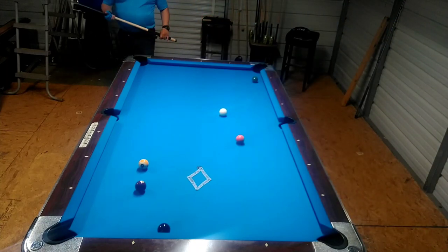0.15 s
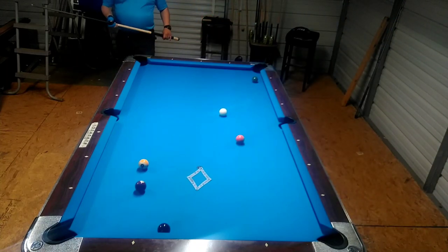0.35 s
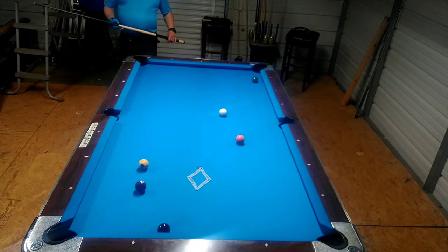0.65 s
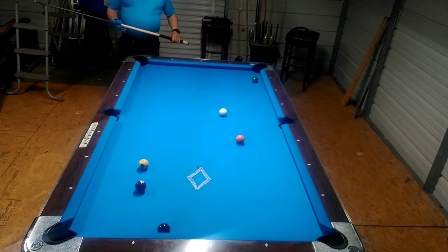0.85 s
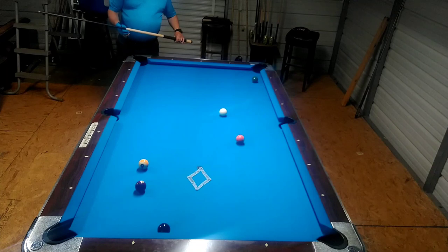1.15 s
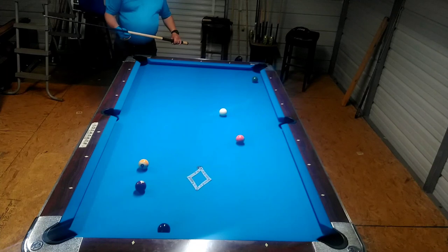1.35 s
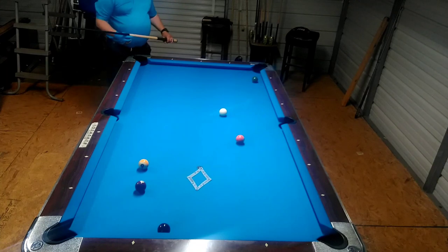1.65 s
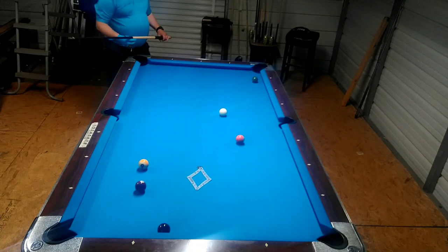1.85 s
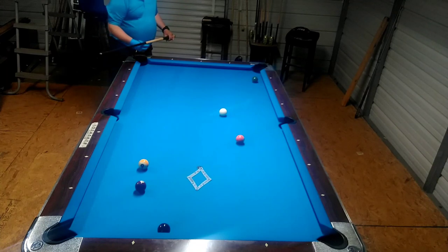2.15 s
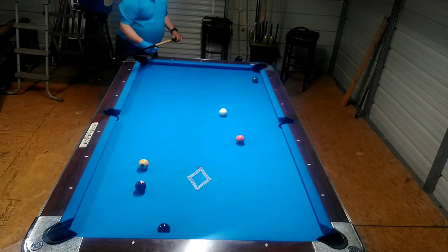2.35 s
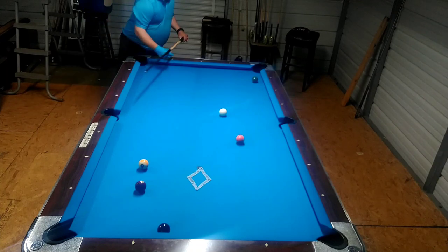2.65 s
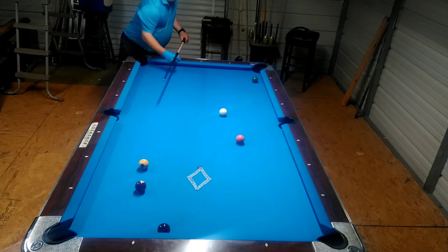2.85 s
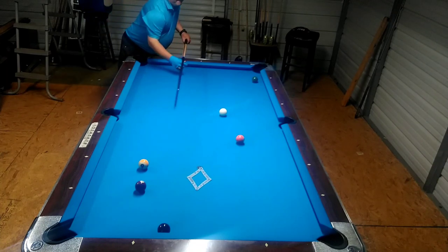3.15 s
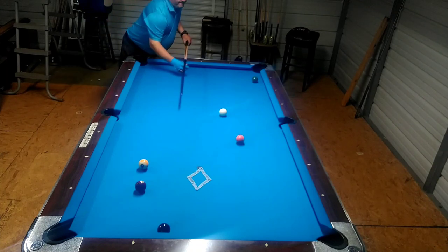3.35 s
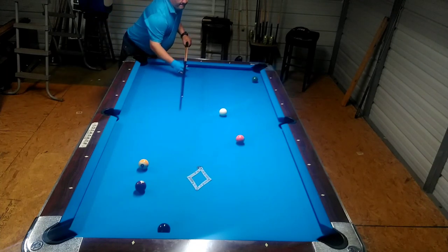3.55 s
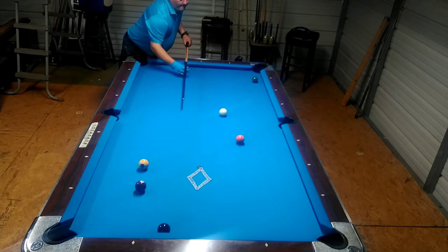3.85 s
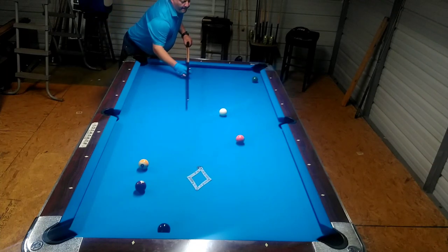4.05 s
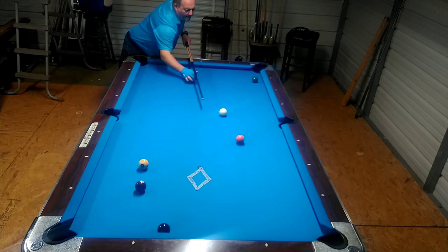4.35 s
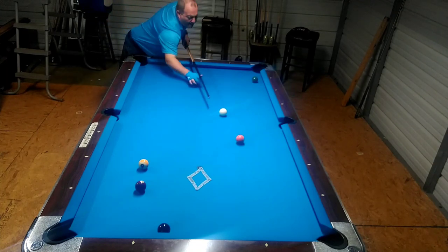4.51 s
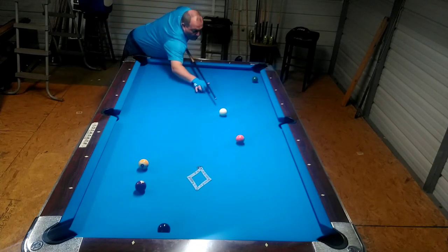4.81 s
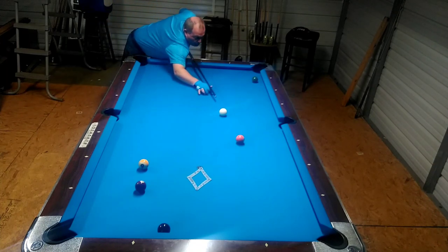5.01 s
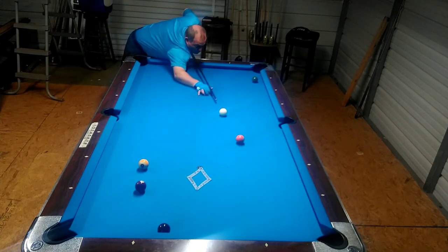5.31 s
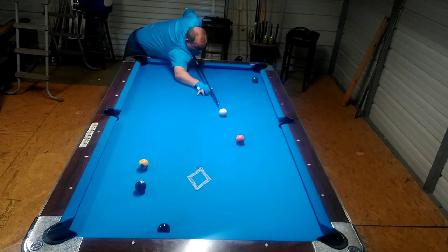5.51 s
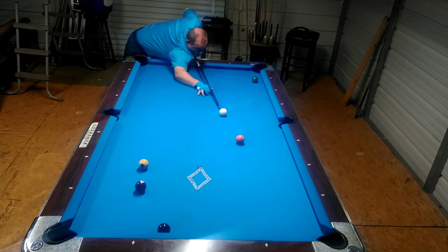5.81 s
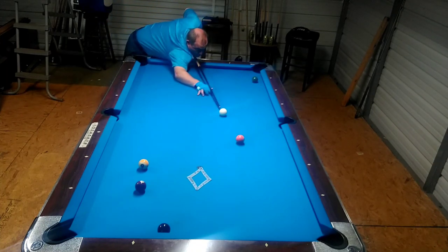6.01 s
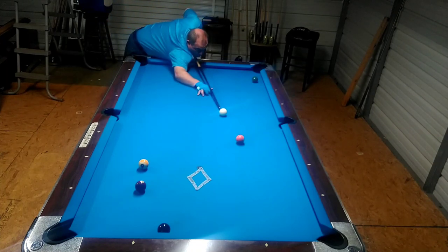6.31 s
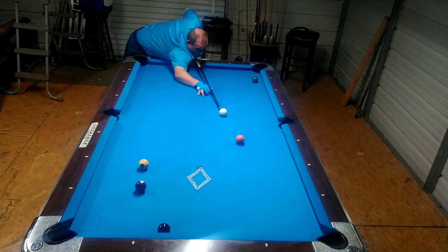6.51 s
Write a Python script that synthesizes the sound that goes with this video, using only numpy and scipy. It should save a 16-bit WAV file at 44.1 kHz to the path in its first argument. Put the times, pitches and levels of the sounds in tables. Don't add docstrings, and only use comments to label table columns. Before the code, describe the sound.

In a garage, a far engine idles low under soft hiss. After a faint cue tap, a pool ball tumbles inside the wooden table with dense hollow knocks, rumbles down the return track with a brief metallic singing, then clunks into the tray and clicks against other balls. Soft glove-and-cue scuffs follow. Small microphone a few meters away, short echo.

```python
import sys
import numpy as np
from scipy import signal
from scipy.io import wavfile
from scipy.ndimage import uniform_filter1d

SR = 44100
rng = np.random.default_rng(int(sys.argv[2]) if len(sys.argv) > 2 else 0)


def volts(x):
    e = np.asarray(x, float) / 20
    return 10 ** e


def wav_out(sig):
    wavfile.write(sys.argv[1], SR, np.round(np.clip(np.atleast_2d(sig).T, -1, 1) * 32767).astype(np.int16))


N = 294134
TIME_S = np.arange(N) / SR
EDGES = 28 * 2 ** np.arange(0, 9.6, .5)


def rms_one(x):
    return x / np.sqrt(np.mean(x ** 2) + 1e-20)


def in_time(rows):
    s, *columns = np.transpose(rows)
    return [np.interp(TIME_S, s, column) for column in columns]


def at_hz(points, hz):
    pitches, values = np.transpose(points)
    return np.interp(np.log(hz), np.log(pitches), values)


def fading(x, t60):
    return signal.lfilter([1], [1, -volts(-60 / (t60 * SR))], x)


def clicks(times, sizes):
    out = np.full(N, 1e-18)
    places = np.minimum((np.asarray(times) * SR).astype(int), N - 1)
    np.add.at(out, places, sizes)
    return out


def ring(x, hz, t60):
    shrink = volts(-60 / (max(t60, .003) * SR))
    turn = 2 * np.pi * hz / SR
    return signal.lfilter([0, np.sin(turn)], [1, -2 * shrink * np.cos(turn), shrink ** 2], x)


def band(x, low_hz, high_hz):
    return signal.sosfilt(signal.butter(2, [low_hz, high_hz], "band", fs=SR, output="sos"), x)


def swell(s, rise, fall):
    t = TIME_S - s
    return np.where(t < 0, rise * t, -fall * t)


def wander(rate, size):
    return np.interp(np.linspace(0, N / SR * rate, size), np.arange(200), rng.standard_normal(200))


def bands(size, gain):
    # pitch_hz, left_right_likeness (1 = the same)
    likeness = [(60, 0.99), (150, 0.9), (380, 0.8), (950, 0.44), (2380, 0.12), (5980, -0.05),
                (15000, -0.02)]
    out, white = 0, rng.standard_normal((2, 2, size))
    for k, (low, high) in enumerate(zip(EDGES, EDGES[1:])):
        mid, side = band(white[k % 2], low, high)
        hz = np.sqrt(low * high)
        alike = np.clip(at_hz(likeness, hz), -1, 1)
        out = out + gain(hz) * (np.sqrt(1 + alike) * mid + np.sqrt(1 - alike) * side * [[1], [-1]])
    return out


def bursts(events, spectrum, t60, trim_db):
    s, peak_db = np.transpose(events)
    shape = fading(clicks(s, volts(peak_db + trim_db)), t60)
    noise = rng.standard_normal(N)
    colour = 0
    for k, (low, high) in enumerate(zip(EDGES[11:], EDGES[12:])):
        sign = (-1) ** k
        colour = colour + sign * volts(at_hz(spectrum, np.sqrt(low * high))) * band(noise, low, high)
    return shape * rms_one(colour)


def garage(x, wet_db, pan_db, lag=3):
    # pitch_hz, t60_s
    echo_times = [(100, 0.91), (260, 0.48), (700, 0.41), (1800, 0.31), (5000, 0.49), (12000, 0.23)]
    t = np.arange(int(.9 * SR)) / SR

    def tail_gain(hz):
        t60 = at_hz(echo_times, hz)
        return volts(-60 * t / t60) / np.sqrt(t60 * SR / 14)

    tail = bands(len(t), tail_gain) * volts(wet_db) * np.clip((t - .002) / 0.00035, 0, 1)
    tail[0, lag] = tail[1, 0] = 1
    return signal.fftconvolve(x[None], tail, axes=1)[:, :N] * volts([[pan_db / 2], [-pan_db / 2]])


def air():
    # pitch_hz, level_db
    hiss = [(200, -24.5), (340, -3), (492, -12), (586, -10.5), (770, -9.5), (995, -12.5), (2250, -14),
            (2440, -15), (3700, -21), (14700, -29.5), (15700, -34.5)]
    # start_s, lift_db
    stir = [(0, 17.5), (.15, 7.5), (4.5, 5), (4.8, 10), (5.2, 6), (5.55, 9.5), (5.85, 3.5), (6.1, 1),
            (6.67, 0.3)]
    noise = bands(N, lambda hz: volts(at_hz(hiss, hz)) * (hz > 200) + volts(10.5) * (hz < 200))
    return volts(-76.5 + in_time(stir)[0]) * noise / np.std(band(noise[0], 310, 16000))


def engine():
    # start_s, level_db
    idle = [(0.0, -52), (1.2, -54.5), (1.55, -46), (2.7, -50.5), (3.6, -48), (4.9, -48.5), (5.9, -50.5),
            (6.3, -51), (6.67, -51)]
    # start_s, cycles_per_s
    idle_rate = [(0, 10.35), (.8, 10.5), (2.0, 10.75), (2.4, 10.55), (2.8, 10.25), (3.2, 9.7), (3.6, 9.9),
                 (4.4, 9.91), (4.8, 10.0), (5.2, 9.84), (5.6, 9.92), (6.0, 9.82), (6.4, 9.45), (6.67, 9.4)]
    # pitch_hz, level_db
    exhaust = [(45, -34.), (60, -17.), (70, -10.), (80, 0.), (89, -3.5), (99, -14.), (110, -25.),
               (122, -10.), (148, -4.), (160, -8.), (180, -18.), (212, -12.), (250, -26.), (330, -38.)]
    # middle_s, depth_db, half_width_s
    misfires = [
        (6.114, -22.5, 0.011),
        (6.18, -8.5, 0.027),
        (6.32, -8, 0.0147),
        (6.44, -13, 0.064),
    ]
    idle_db = in_time(idle)[0]
    coarse = 20
    level_db, rate = idle_db[::coarse], in_time(idle_rate)[0][::coarse]
    size = len(rate)
    upper_db = -1 + 2 * (level_db - level_db.mean())
    cycle = np.cumsum(rate) * coarse / SR
    cycle = cycle - cycle[int(5.497 * SR / coarse)] + 0.032 * wander(8.3, size)
    throb = 0
    for order in range(4, 33):
        scatter = .02 * abs(order - 8.5) * rng.standard_normal() + .04 * wander(4., size)
        scatter = scatter + .4 * (order < 8)
        turn = order * (cycle - .5) - 0.024 * (order - 8.5) ** 2 + scatter
        gain_db = at_hz(exhaust, order * rate) + (order > 10) * upper_db + 2.5 * wander(5., size)
        throb = throb + volts(gain_db) * np.cos(2 * np.pi * turn)
    throb = signal.resample_poly(throb, coarse, 1, padtype="line")[:N] * volts(idle_db + 6.0)
    for s, depth_db, half_width_s in misfires:
        throb = throb * volts(depth_db * np.exp(-((TIME_S - s) / half_width_s) ** 2))
    breath = rms_one(band(rng.standard_normal(N), 170, 350))
    throb = throb + volts(-29.5) * uniform_filter1d(np.abs(throb), size=500) * breath
    lag = 6
    return np.array([throb, np.r_[throb[:lag], throb[:-lag]]]) * volts([[-.3], [.3]])


def ticks():
    # start_s, peak_db
    rattles = [(0.0247, -54), (1.9656, -76), (1.9704, -51.5), (3.254, -48.5), (1.585, -62), (1.641, -55),
               (1.669, -59), (1.778, -61), (4.5137, -58.5), (3.43, -54.5), (5.05, -57), (0.553, -49),
               (1.104, -48.5), (1.15, -53), (1.19, -42), (1.32, -44.5)]
    # pitch_hz, level_db_per_hz
    tick_colour = [(760, -39), (1300, -9), (1490, -4.5), (1720, -5.5), (2100, -22.5), (2200, -25.5),
                   (2800, -9), (4000, -27), (5950, -18.5), (14000, -49.5)]
    return bursts(rattles, tick_colour, 0.033, trim_db=-6.0)


def cue():
    # start_s, peak_db
    touch = [
        (0.1468, -49.5),
    ]
    # peak_s, shaft_ring_db, scuff_db
    slides = [
        (4.71, -110, -66),
        (4.78, -110, -50),
        (5.049, -110, -55.5),
        (5.15, -75, -81),
        (5.27, -83, -82),
        (5.39, -78.5, -72),
        (5.69, -89.5, -70),
        (5.975, -105, -66.5),
        (6.6, -110, -62),
    ]
    s, peak_db = np.transpose(touch)
    slide_s, ring_db, scuff_db = np.transpose(slides)
    rise = 408
    rings = volts(np.array([swell(at, rise, 47) for at in slide_s]))
    strokes = volts(np.array([swell(at, rise, 162) for at in slide_s]))
    rub = rng.standard_normal(N)
    shaft = rms_one(band(ring(rub, 1130, .1), 1000, 1300)) * (volts(ring_db - 8.) @ rings)
    scuff = rms_one(band(rub, 1300, 2050)) * (volts(scuff_db - 20.) @ strokes)
    knock = band(ring(clicks(s, volts(peak_db + 1.0)), 1143, 0.045), 800, 1600)
    return knock + shaft + scuff


def knocks():
    # start_s, peak_db, hardness_db, glancing_edge_db, bite_db
    tumbles = [(0.429, -31.5, -0.5, 3.5, -8), (0.442, -34.5, -13, -4, -3), (0.463, -31, -10, 8, -3.5),
               (0.551, -26.5, 5.5, 4.5, -14), (0.563, -15, 1.5, -1, -7), (0.609, -23.5, -18.5, -6.5, -5),
               (0.631, -23, -5.5, 4, 1), (0.654, -12.5, 0.5, -15, -1.5), (0.664, -18.5, 1.5, -3, 4),
               (0.689, -15, -15, 7, 1.5), (0.721, -17.5, -8, -14.5, 4), (0.787, -28, -14, -2, -2.5),
               (0.836, -38, -7.5, 2, 4), (1.101, -19, 0.5, -1, -22.5), (1.107, -19, -2.5, 2.5, -27),
               (1.133, -12, -6.5, -9, -6.5), (1.148, -15, -10, -3.5, -8.5), (1.173, -27, 1, 4.5, -1.5),
               (1.181, -13.5, 0, -3.5, -2), (1.202, -23.5, -11, -1.5, -1), (1.271, -15, -7, -4, 3.5),
               (1.313, -15, -6.5, -12.5, 6.5), (1.341, -20, -19, 4.5, 7.5), (1.419, -30, -12, 11, 1),
               (1.481, -41.5, -9.5, 8, 5.5), (1.579, -21, -25.5, -2.5, 5), (1.64, -32.5, -15, 16, 4.5),
               (1.667, -29.5, -18.5, 10, 3.5), (1.692, -25, -22, -1.5, 9), (1.714, -20, -22.5, 3, 3),
               (1.788, -24, -34, -9.5, 0)]
    # start_s, peak_db, hardness_db, glancing_edge_db, bite_db
    landings = [(3.254, -47.5, -3, 2, -7.5), (3.298, -41, -27.5, -6, 2), (3.437, -31, -19, -3, 0),
                (3.502, -21.5, 1, 7, -7.5), (3.511, -25, -1.5, 7, -16), (3.543, -19.5, -3.5, 5, -4),
                (3.551, -22, -3.5, 6, -9), (3.597, -19, -7, -4, -4), (3.682, -22.5, -4.5, 7.5, -4.5),
                (3.719, -23.5, -21, -7, 0), (3.947, -26, -5, -9, 4), (4.031, -45, -1, -2.5, 9.5),
                (4.39, -23, -3, -1.5, -6.5), (4.407, -38, -15, -10, -1), (4.439, -30.5, -7, -10, -7)]
    s, peak_db, hard_db, glance_db, bite_db = np.transpose(tumbles + landings)
    in_tray = np.tile(np.arange(len(s)) >= len(tumbles), 2)
    s = np.r_[s, s + .0107]
    peak_db = np.r_[peak_db, peak_db - 14]
    hard_db = np.r_[hard_db, hard_db - 6.5]
    edge_db = 1.43 * hard_db + np.tile(glance_db, 2) + np.where(in_tray, -5, -14)
    crack_db = .15 * hard_db + np.where(in_tray, -37, -45.5)
    return s, peak_db, hard_db, edge_db, np.tile(bite_db, 2), crack_db


def roll():
    # start_s, rumble_db, lean_db (from long panel to tray floor)
    track = [(0.0, -50, 2.5), (0.4, -42, 9.5), (1.0, -51.5, -12), (1.35, -33, -1), (1.53, -32.5, -7),
             (1.74, -30.5, -14), (2.08, -40, 10.5), (2.27, -35, 12.5), (2.58, -29.5, 1.5),
             (3.07, -34.5, 3.5), (3.45, -31.5, -8), (3.85, -47.5, 8), (4.65, -53.5, -17),
             (4.85, -62, -16.5)]
    sizes = volts(4.35 * np.minimum(rng.exponential(1, N), 4)) * rng.choice([-1, 1], N)
    bumps = rms_one(sizes * (rng.random(N) < 900 / SR))
    return bumps, *in_time(track)


def booms(heavy, lean_db):
    # start_s, long_panel_db, tray_floor_db (added to the panel's)
    heavy_blows = [(0.429, -45.5, 13.5), (0.506, -45, 6.5), (0.653, -24.5, 4), (1.102, -25.5, -3),
                   (1.1844, -16.5, -24), (1.2035, -15, -20), (1.2234, -14.5, -15), (1.2419, -21, -16),
                   (1.2627, -19.5, -18.5), (1.309, -20, -16), (1.338, -22, -15.5), (1.418, -29, -8),
                   (1.714, -22.5, -7), (1.839, -23, -3.5), (3.302, -28.5, -30), (3.437, -33, 2.5),
                   (3.542, -20, -13.5), (3.683, -35, 17), (3.722, -29.5, -14.5), (3.946, -40.5, 18),
                   (4.03, -31, -2.5), (4.388, -39, 8)]
    s, panel_db, floor_db = np.transpose(heavy_blows)
    on_panel = clicks(s, volts(panel_db + 2.0)) + heavy * volts(-36 - lean_db)
    on_floor = clicks(s, volts(panel_db + floor_db + 2.5)) + heavy * volts(-38.5 + lean_db)
    boom = ring(on_panel, hz=209.7, t60=0.14) + ring(on_floor, hz=253.8, t60=0.18)
    return band(band(boom, 140, 290), 171, 330)


def cabinet():
    # pitch_hz, level_db, t60_s
    panels = [(140.5, -10.5, 0.17), (151, -13.5, 0.088), (302, 3, 0.023), (312, 5, 0.033),
              (391.4, 2.5, 0.062), (438, -2.5, 0.06), (484, 2.5, 0.044), (568, -2.5, 0.078),
              (627.6, 2.5, 0.026), (631.3, -8.5, 0.015), (638, -7, 0.024), (736.4, 1, 0.039),
              (730, -1.5, 0.0056), (938, -6.5, 0.021), (1001, -10, 0.037), (990, -21.5, 0.041),
              (1040, -34, 0.023), (1247, -21.5, 0.0077), (1190, -3, 0.013), (1380, -4, 0.007),
              (1532, 1, 0.018), (1790, -7, 0.0054), (1826, -0.5, 0.012), (1970, -7.5, 0.011),
              (2160, -15.5, 0.019), (2380, -6, 0.013), (2704, -19, 0.012), (2880, -18, 0.012)]
    panel_sizes = [600, 950, 1450, 2500]
    s, peak_db, hard_db, edge_db, bite_db, crack_db = knocks()
    bumps, rumble_db, lean_db = roll()
    heavy = bumps * volts(rumble_db)
    shudder = fading(clicks(s, volts(peak_db - 10.5)), 0.24)
    bumps = bumps * np.hypot(volts(rumble_db), shudder)
    gritty = bumps * volts(-16 + np.clip(3.5 * (TIME_S - 2.15), 0, 5.5))
    dealt = rng.integers(0, 3, N)
    shape = (len(s), len(panels))
    spread = volts(rng.normal(0, 2.3, shape)) * rng.choice([-1, 1], shape)
    tilt_db = [0 * s - 12.5, hard_db, edge_db - 7.5, edge_db - 0.5 + bite_db]
    grain = rng.standard_normal(N)
    scrunch = (grain, grain[::-1])
    fade, build = volts(-60 / (0.026 * SR)), np.exp(-1 / (.002 * SR))
    shake = np.convolve([1, -fade], [1, -build])
    wood = np.zeros((3, N))
    for k, (hz, level_db, t60) in enumerate(panels):
        middle, high = 690 < hz < 1200, hz > 1200
        share = [np.interp(np.log(hz), np.log(panel_sizes), row) for row in np.eye(len(panel_sizes))]
        blows = clicks(s, volts(peak_db + np.dot(share, tilt_db)) * spread[:, k])
        if high:
            blows = volts(-13) * signal.lfilter([1 - build], shake, blows) * scrunch[k % 2]
        rolling = gritty if high else bumps * volts(middle * -3.5)
        rolling = rolling * (dealt == k % 3) * volts(-36.5)
        wood[middle + 2 * high] += volts(level_db) * ring(blows + rolling, hz, t60)
    small = volts(3.0) * band(wood[2], 890, 3700)
    wood = band(wood[0], 110, 900) + band(wood[1], 500, 2300)
    push = ring(clicks(s, volts(peak_db - 9)), 480, 0.023)
    thud = ring(clicks(s, volts(peak_db - 32)), 55, 0.3)
    puff = fading(clicks(s, volts(peak_db + crack_db)), 0.054)
    crack = band(puff * rng.standard_normal(N), 3600, 7000)
    return wood - push + thud + crack, small, booms(heavy, lean_db)


def tones():
    # start_s, pitch_hz, peak_db, t60_s
    single_tones = [(0.424, 1050, -40.5, 0.028), (0.560, 755, -21, .03), (0.657, 1001, -21.5, 0.073),
                    (0.661, 1670, -36, 0.055), (1.103, 1370, -30, 0.027), (1.133, 568, -18, .06),
                    (1.149, 1150, -24.5, .02), (1.184, 630, -17, 0.056), (1.271, 800, -22.5, .03),
                    (1.312, 600, -19, .04), (1.341, 528, -21, .04), (3.503, 700, -21, 0.043),
                    (3.505, 1497, -24, 0.037), (3.511, 1420, -15.5, 0.013), (3.543, 800, -25.5, 0.048),
                    (3.546, 1490, -27, 0.027), (3.551, 1030, -18, .015), (3.565, 977, -28, .04),
                    (3.683, 1230, -24, 0.033), (3.684, 2010, -34.5, .02), (4.19, 980, -43, 0.012),
                    (4.199, 2106, -35, .03), (4.39, 694, -26.5, 0.052), (4.4, 953, -34, 0.057),
                    (4.629, 1510, -51, 0.02), (4.639, 1965, -48, 0.026), (5.47, 1680, -60, 0.017)]
    out, blow = np.zeros(N), np.r_[1, np.full(SR // 8, 1e-18)]
    for s, hz, peak_db, t60 in single_tones:
        start = int(s * SR)
        out[start:start + len(blow)] += volts(peak_db) * band(ring(blow, hz, t60), .8 * hz, 1.25 * hz)
    return out


def pings():
    # start_s, pitch_hz, peak_db, t60_s
    brushes = [(1.962, 10300, -73, 0.05), (1.964, 9200, -78, 0.12), (1.965, 7100, -77, 0.06),
               (1.968, 6000, -77, 0.14), (1.971, 3500, -71, 0.12), (1.972, 2400, -62, 0.03),
               (3.248, 1480, -49, 0.17), (3.25, 9900, -85, .1), (3.251, 5950, -73, .2),
               (3.251, 7800, -75, .22), (3.252, 2800, -59, 0.09), (3.252, 5400, -73, .18),
               (3.256, 4600, -73, 0.15), (3.262, 3150, -63, 0.16)]
    out, scrape, t = np.zeros(N), rng.standard_normal(N), np.arange(SR // 2) / SR
    for s, hz, peak_db, t60 in brushes:
        span = slice(int(s * SR), int(s * SR) + len(t))
        half_width = hz / 7.8 / 2
        rough = rms_one(band(scrape[span], hz - half_width, hz + half_width))
        out[span] += volts(peak_db - 60 * t / t60) * rough
    return out


def rails():
    # pitch_hz, width_hz, level_db
    rail_bands = [(1852, 98, 0.5), (2500, 110, -9.5), (3546, 80, -26), (3860, 36, -21), (4970, 52, -27),
                  (5400, 160, -14.5), (6100, 55, -35), (7600, 140, -23.5), (8380, 52, -44),
                  (8830, 60, -36.5), (9800, 140, -37), (10520, 320, -23), (12300, 48, -42),
                  (13200, 300, -37.5)]
    grit, song = rng.standard_normal(N), 0
    for hz, width, level_db in rail_bands:
        voice = rms_one(band(grit, hz - .7 * width, hz + .7 * width))
        song = song + volts(level_db + 3.5 * wander(22., N)) * voice
    haze = volts(-10.0) * rms_one(band(band(grit, 1500, 7300), 1000, 11500))
    start_s, hold_s = 2.468, 0.29
    held_db = swell(start_s, 119, 23) + swell(start_s + hold_s, 0, 87)
    return (song + haze) * volts(-62 + held_db)


def jolts():
    # start_s, peak_db
    shoves = [
        (3.5014, -21),
        (3.5079, -47.5),
        (3.5294, -44.5),
        (3.5479, -43),
        (3.5814, -45),
        (3.686, -48),
    ]
    # pitch_hz, level_db_per_hz
    jolt_colour = [(1470, -34), (2500, -1), (2740, -3), (3150, -10), (3760, -11), (4800, -0.5), (6300, -6),
                   (7730, -9), (15700, -36.5)]
    return bursts(shoves, jolt_colour, 0.061, trim_db=-13.0)


def clacks():
    # start_s, peak_db, treble_db, tilt_db_per_octave
    meetings = [(3.9142, -18, -38.5, -18), (3.9225, -22.5, -46, 5.5), (3.930, -32.5, -52, 7),
                (3.957, -35, -45, -6), (3.989, -45, -47, -2), (4.1905, -35, -34.5, -1),
                (4.199, -30, -55, -9.5), (4.205, -52, -48, -10), (4.6283, -44, -51, -18),
                (4.6387, -55, -43, -8), (5.05, -51, -35, -1), (5.469, -53, -39, -13),
                (5.477, -69.5, -45, -12), (5.977, -61, -30, -6), (6.598, -73.5, -24, -11)]
    # pitch_hz, level_db, t60_s
    clack_modes = [(1230, -20, 0.03), (1540, -4, 0.029), (1540, -8.5, .03), (1833, -8.5, .02), (1880, 0, 0.032),
                   (2240, -4.5, 0.023), (2133, -5.5, 0.035), (2430, -3.5, 0.02), (2414, -3.5, 0.019),
                   (2650, -14.5, 0.022), (2860, -21, .02), (3100, -32.5, 0.027), (4445, 6, 0.015),
                   (6700, 5, 0.00443), (8400, 7.5, 0.0041), (11000, -5.5, .004), (13300, 0.5, 0.008)]
    s, peak_db, treble_db, tilt_db = np.transpose(meetings)
    spread = rng.normal(0, 1.2, (len(s), len(clack_modes)))
    fresh = rng.standard_normal(N)
    out = np.zeros((2, N))
    for k, (hz, level_db, t60) in enumerate(clack_modes):
        glint = hz > 4000
        octaves = np.log2(max(hz / 1570, 1))
        lean_db = treble_db + 9.0 if glint else tilt_db * octaves
        touches = clicks(s, volts(peak_db + level_db + lean_db + spread[:, k] - 9.5))
        chatter = volts(-15.5) * fading(touches, 0.027) * np.roll(fresh, 997 * k)
        out[int(glint)] += ring(touches + chatter, hz, t60)
    return band(band(out[0], 1100, 2900), 940, 3000) + band(out[1], 3800, 15000)


def scene():
    background = air() + engine()
    wood, small, boom = cabinet()
    body = garage(ticks() + cue() + wood + pings() + rails(), wet_db=4.0, pan_db=-0.46)
    deep = garage(boom, wet_db=-7.0, pan_db=0.6, lag=0)
    jolt = garage(jolts(), wet_db=5.5, pan_db=-3.0)
    jolt[1] = signal.sosfilt(signal.butter(2, 6500, fs=SR, output="sos"), jolt[1])
    hard = garage(clacks() + tones() + volts(-1.5) * small, wet_db=-3.0, pan_db=0.3)
    return background + body + deep + jolt + hard


def low_pass(x):
    return signal.sosfilt(signal.butter(12, 15520, fs=SR, output="sos"), x)


def record(dry):
    mix = signal.sosfilt(signal.butter(4, 42, "high", fs=SR, output="sos"), dry)
    return low_pass(mix)


dry = scene()
out = record(dry)
wav_out(out)
```